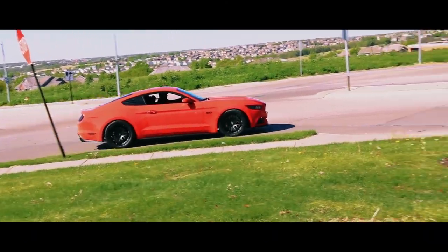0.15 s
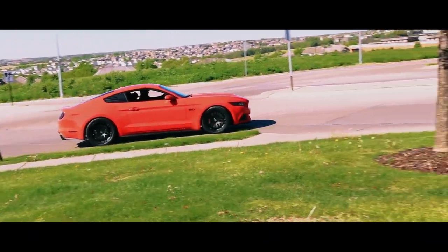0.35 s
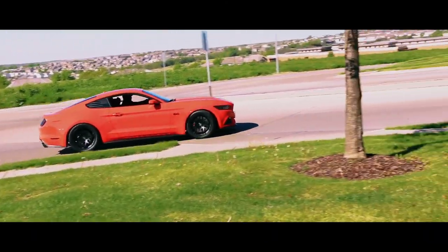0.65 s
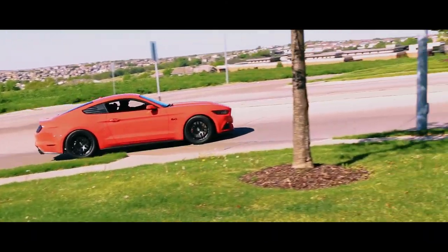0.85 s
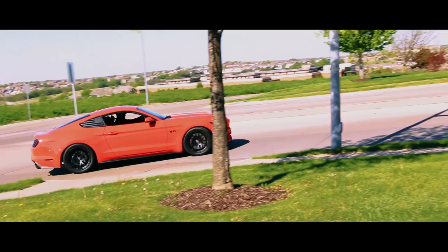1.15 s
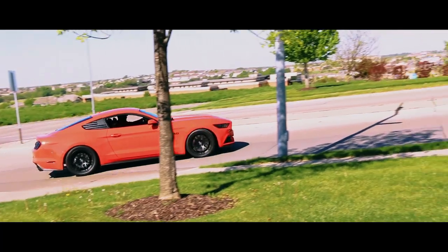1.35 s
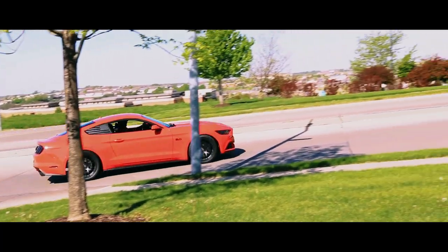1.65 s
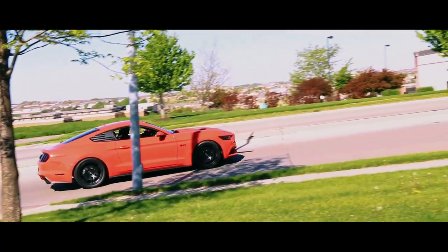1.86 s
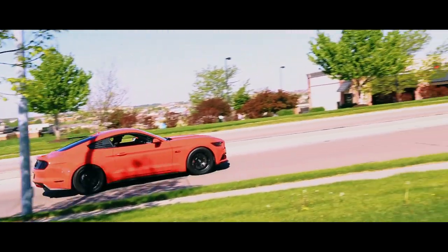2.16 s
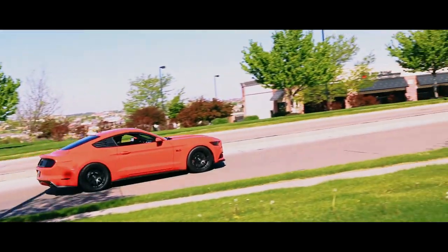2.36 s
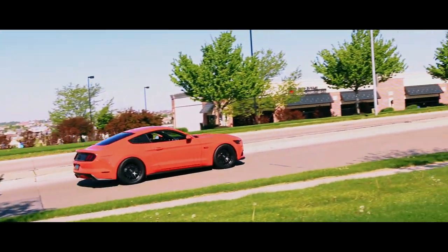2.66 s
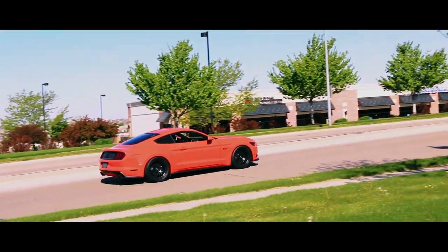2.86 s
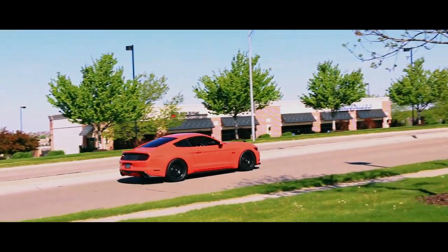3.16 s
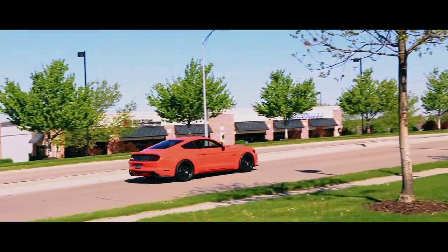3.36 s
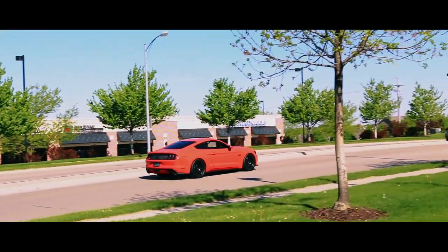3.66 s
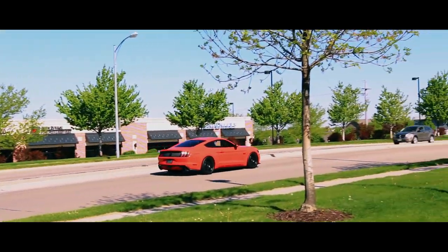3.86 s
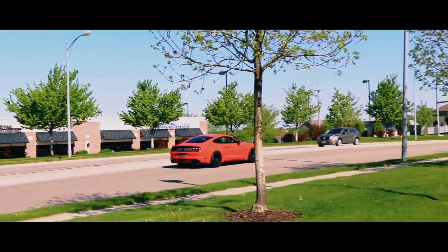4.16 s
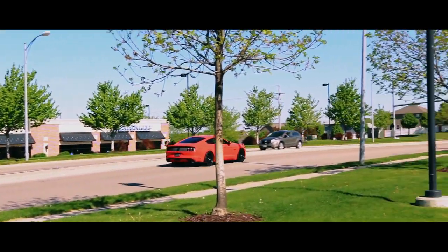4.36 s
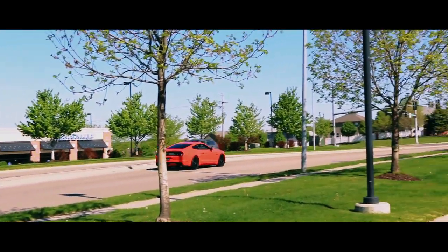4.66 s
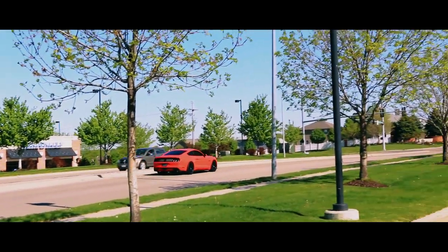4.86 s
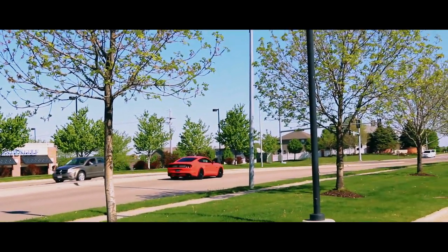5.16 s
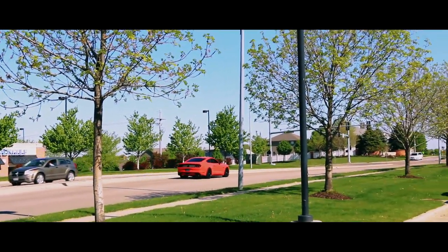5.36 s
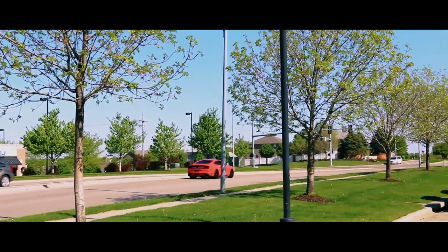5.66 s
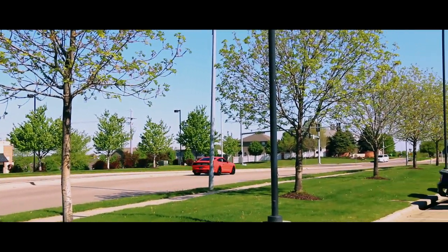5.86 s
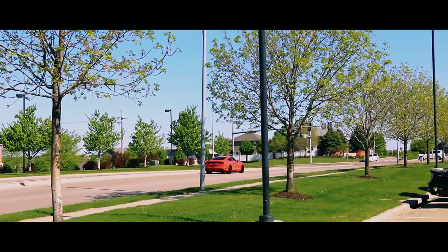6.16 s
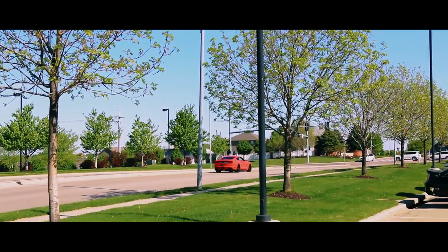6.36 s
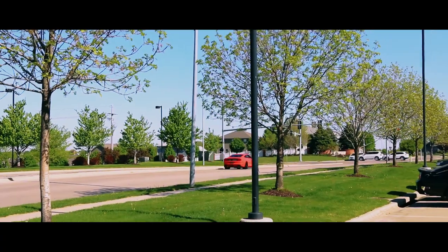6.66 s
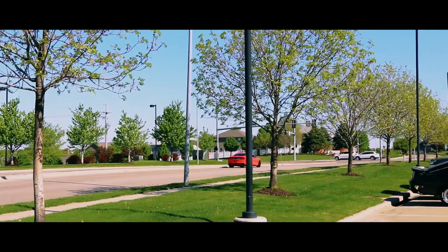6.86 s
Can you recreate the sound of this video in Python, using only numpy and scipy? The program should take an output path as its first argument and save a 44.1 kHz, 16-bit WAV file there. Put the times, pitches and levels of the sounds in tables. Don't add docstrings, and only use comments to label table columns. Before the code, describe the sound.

Loud V8 exhaust drone climbs and turns raspy as it passes, lifts with pops, surges in second gear, then recedes amid sharp backfires.

```python
import sys
import numpy as np
from scipy import signal
from scipy.io import wavfile
from scipy.ndimage import uniform_filter1d, map_coordinates

SR = 44100
rng = np.random.default_rng(int(sys.argv[2]) if len(sys.argv) > 2 else 0)


def how_loud(loudness_db):
    steps = np.asarray(loudness_db, float) / 20
    return 10 ** steps


def to_wav(sig):
    pcm = np.clip(np.atleast_2d(sig), -1, 1) * 32767
    pcm = np.round(pcm).astype(np.int16)
    wavfile.write(sys.argv[1], SR, pcm.T)


N = 308700
T = np.arange(N) / SR
PASS_S = 2.786


def evened(x):
    return x / np.sqrt(np.mean(x ** 2) + 1e-20)


def levelled(x):
    return x / np.sqrt(abs(uniform_filter1d(x ** 2, SR // 4)) + 1e-12)


def curves(rows):
    s, *columns = np.transpose(rows)
    return [np.interp(T, s, c) for c in columns]


def rise(s, span):
    return .5 + .5 * np.tanh((T - s) / span)


def passed(x, hz, kind):
    return signal.sosfilt(signal.butter(4, hz, kind, fs=SR, output="sos"), x)


def colour(x, points):
    hz, db = np.transpose(points)
    circle = abs(np.fft.fftfreq(8192, 1 / SR)) + 1
    gain_db = np.maximum(np.interp(np.log(circle), np.log(hz), db), -70)
    log_gain = np.log(how_loud(gain_db))
    taps = np.fft.ifft(np.exp(np.conj(signal.hilbert(log_gain)))).real[:4096]
    return signal.oaconvolve(x, taps)[:N]


def resonate(x, hz, width):
    turn = np.exp(2j * np.pi * np.cumsum(hz * np.ones(N)) / SR)
    r = np.exp(-np.pi * width / SR)
    return 2 * (turn * signal.lfilter([1 - r], [1, -r], x / turn + 1e-18)).real


def fading(x, seconds):
    return signal.lfilter([1], [1, -np.exp(-1 / (seconds * SR))], x)


def delayed(x, hz):
    return map_coordinates(x, [np.arange(N) - SR / hz], order=1)


# start_s [s], level_db [dB]
WIND = [(0, -26), (.3, -28), (.75, -38), (1.4, -35.5), (1.7, -43), (2.5, -41), (3.0, -56), (3.9, -38),
        (4.2, -58.5), (6.2, -37), (6.42, -23.5), (7, -32.5)]
# pitch_hz [Hz], level_db [dB]
GUST = [(15, -20.5), (25, -3), (60, 5.5), (110, 1.5), (160, 1), (220, -8.5)]
# start_s [s], level_db [dB]
THUMPS = [
    (0.151, -9),
    (.163, -7),
    (0.231, -13.5),
]


def wind():
    lumps_db = 1.5 * evened(uniform_filter1d(rng.standard_normal(N), 1800))
    slow = uniform_filter1d(uniform_filter1d(rng.standard_normal(N), 2500), 2500)
    gusts_db = -1 * evened(slow)
    knocks = sum(-how_loud(db) * np.exp(-((T - s) / 0.0048) ** 2) for s, db in THUMPS)
    buffeting = passed(how_loud(lumps_db) * colour(rng.standard_normal(N), GUST), 970, "low")
    return passed(knocks, 25, "high") + how_loud(curves(WIND)[0] + 1.0 + gusts_db) * levelled(buffeting)


def foliage():
    hiss = colour(rng.standard_normal(N), [(3000, -23.0), (6500, -5.0), (9000, -10.5), (15000, -28)])
    return how_loud(-60.5) * (0.61 + np.exp(-T / 0.97)) * evened(hiss)


def oncoming():
    since = T - 4.25
    hz = 74.64 - 2.1 * since
    waver_db = 0.5 * evened(uniform_filter1d(rng.standard_normal(N), 6000))
    hum_db = -48 + 8.5 * since + waver_db
    rumble_db = np.minimum(-57 + 12 * since, -27.5)
    near = np.clip(since / 0.057, 0, 1)
    hum = np.sqrt(2) * how_loud(hum_db) * np.sin(2 * np.pi * np.cumsum(hz) / SR)
    rumble = colour(rng.standard_normal(N), [(70, -50), (95, -14.0), (116, 14.0), (180, 9.5), (260, -51.5)])
    tyre_points = [(1500, -49.5), (2800, 7), (4500, 7.0), (5500, -17.5), (9000, -44)]
    tyres = evened(colour(rng.standard_normal(N), tyre_points))
    tyres = how_loud(-29.5) * np.exp(-((T - 6.65) / 0.26) ** 2) * tyres
    return passed(near * (hum + how_loud(rumble_db) * evened(rumble)), 900, "low") + tyres


def street(x):
    t = np.arange(SR // 2) / SR
    signs = rng.choice([-1., 1.], len(t))
    taps = signs * (rng.random(len(t)) < .05) * how_loud(-60 * t / 0.36) * (t > .012)
    return signal.oaconvolve(x, taps / np.linalg.norm(taps))[:N]


def ground(x):
    echo_hz = np.maximum(283.3 + 96.6 * (T - PASS_S), 283.6)
    weak, strong, edge_s = 0.31, 0.6, 0.14
    strength = weak + (strong - weak) * rise(0.36, edge_s) * (1 - rise(5.2, edge_s))
    since_kerb = T - 4.91
    kerb_hz = np.clip(2540 + 900 * since_kerb, 1900, 3300)
    kerb = 0.18 + (0.73 - 0.18) * np.exp(-(since_kerb / 0.67) ** 2)
    dull = signal.lfilter([.33], [1, -.67], x)
    bright = passed(x - dull, 8200, "low")
    return x + np.clip(strength, 0, 1) * delayed(dull, echo_hz) + np.clip(kerb, 0, 1) * delayed(bright, kerb_hz)


# pitch_hz [Hz], level_db [dB], decay_t60_s [s]
POP_MODES = [(333, -4.5, 0.054), (669, -6.5, 0.042), (1069, -3.5, 0.022)]
# start_s [s], peak_db [dB], treble_db [dB over the peak]
POPS = [(.054, -4.5, -46.5), (0.149, -9, -48), (0.264, -4.5, -40.5), (0.316, -0.5, -46), (0.873, -9.5, -37),
        (0.968, -11, -40), (1.017, -14, -43), (1.609, -7.5, -35), (3.226, -10.5, -45.5), (3.241, -9.5, -40),
        (3.276, -7, -43), (3.292, -10.5, -51), (3.418, -5, -43.5), (3.483, -20.5, -49), (3.572, -15, -44),
        (3.61, -7, -47), (3.65, -15, -44), (3.673, -11, -42.5), (3.691, -6.5, -60), (5.357, -7, -22),
        (5.406, -10, -47), (5.755, -1, -55), (5.933, 0, -28), (6.051, -1, -35), (6.089, 0, -31),
        (6.106, 9, -24), (6.168, 5.5, -23), (6.197, -7.5, -25.5), (6.206, 6, -18), (6.427, -1.5, -34),
        (6.593, -4.5, -27), (6.775, 6, -26), (6.822, -6, -32), (6.843, -8.5, -25.5), (6.867, -11.5, -36),
        (6.948, -3, -30), (6.965, -1.5, -36)]


def pops():
    t = np.arange(2600) / SR
    out = np.zeros(N + 2600)
    ring = sum(how_loud(d - 60 * t / t60) * np.sin(2 * np.pi * hz * t) for hz, d, t60 in POP_MODES)
    ring = ring * (1 - np.exp(-t / 0.00074))
    for (s, db, treble_db), noise in zip(POPS, rng.standard_normal((len(POPS), len(t)))):
        burst = (noise - 4 * (t == 0)) * np.exp(-t / .0018)
        grit = passed(passed(burst, 320, "high"), 3470, "low")
        spit = passed(passed(burst, 3500, "high"), 11000, "low")
        body = ring + 1.87 * how_loud(treble_db + 27.0) * grit
        pop = body / abs(body).max() + how_loud(treble_db - 1.5) * spit / abs(spit).max()
        out[int(s * SR):][:len(t)] += how_loud(db - 3) * pop
    return ground(out[:N])


# start_s [s], peak_db [dB]
SNAPS = [(3.953, -31), (3.981, -25.5), (3.9857, -28), (4.0062, -29), (4.0216, -21.5), (4.0445, -26),
         (4.0471, -20.5), (4.063, -26.5), (4.068, -23.5), (4.1079, -17), (4.1116, -19), (4.114, -16.5),
         (4.116, -19), (4.1187, -23.5), (4.1349, -18), (4.138, -23), (4.1518, -17.5), (4.1546, -19.5),
         (4.1824, -21), (4.2471, -22), (4.255, -28.5)]


def snaps():
    t = np.arange(400) / SR
    out = np.zeros(N)
    for (s, db), noise in zip(SNAPS, rng.standard_normal((len(SNAPS), len(t)))):
        out[int(s * SR):][:len(t)] += how_loud(db + 15) * (noise - 3 * (t == 0)) * np.exp(-t / 0.00077)
    return passed(colour(out, [(2000, 19.5), (6000, -10.5), (15000, -30)]), 4200, "high")


# strength_db [dB], lateness [share of firing gap], hiss_db [dB]
FACING = [(-12, 0, 0), (0, .02, -4), (-3, -.08, -16), (-4, .06, -14), (0, 0, -5), (-4, -.1, -14),
          (-7, -.07, -17), (-12, 0, -20)]
# pitch_hz [Hz], width_hz [Hz], level_db [dB]
MOUTH = [(636, 360, 17.5), (1060, 650, 22.5), (2500, 1100, -19.5)]
FACING_FROM_S, FACING_TO_S = 2.297, 2.99


def tailpipe(cycles):
    count = int(8 * cycles[-1]) - 4
    db, late, hiss_db = np.array(FACING)[np.arange(count) % 8].T
    chance = rng.standard_normal((count, 2))
    firing = np.arange(count) + 3.9 + late + .015 * chance[:, 0]
    at = np.interp(firing / 8, cycles, np.arange(N)).astype(int)
    clicks, puffs = (np.bincount(at, how_loud(d + chance[:, 1]), N) for d in (db, hiss_db))
    rasp_points = [(1100, -27.5), (1700, -2), (2500, -3), (3300, 2.5), (5500, -10), (9000, -34)]
    rasp = colour(np.bincount(at, how_loud(.3 * db), N), rasp_points)
    t = np.arange(400) / SR
    pulse = sum(how_loud(d) * np.exp(-np.pi * w * t) * np.cos(2 * np.pi * hz * t) for hz, w, d in MOUTH)
    ring_points = [(150, -8), (400, -6.5), (3000, 0.0), (5500, -11.0), (9000, -33.5), (15000, -51.5)]
    ring = colour(signal.oaconvolve(clicks, pulse)[:N], ring_points)
    ring = ring + 0.21 * delayed(ring, 410)
    hiss_points = [(1500, -27.5), (3000, 10.0), (6000, 2.5), (9000, -16.5), (15000, -34.5)]
    hiss = colour(fading(puffs, .003) * rng.standard_normal(N), hiss_points)
    ticks = colour(puffs, [(3000, -29.0), (6000, 4.5), (15000, -15)])
    spit = how_loud(-10.5) * levelled(hiss) - how_loud(-27.5) * levelled(ticks) - how_loud(-13) * levelled(rasp)
    return spit * (1 - 1.3 * rise(FACING_TO_S - .08, 0.019)) - levelled(ring)


# strength_db [dB], lateness [share of firing gap], bank [0 left, 1 right]
CYLINDERS = [(-9, -0.017, 0.18), (-1, -.06, 0.91), (3.5, 0.011, 0.85), (-13, 0.039, 0.055), (0, 0.1, 0.93),
             (1.5, -0.0055, 0.12), (3, -0.044, 0.3), (-1.5, .04, 0.99)]


def firings(cycles, uneven, scatter_db, jitter):
    bank_lag_s = 0.001108
    count = int(8 * cycles[-1])
    strength_db, late, bank = np.array(CYLINDERS)[np.arange(count) % 8].T
    chance = rng.standard_normal((count, 2))
    at = np.interp((np.arange(count) + 0.2331 + late) / 8, cycles, np.arange(N)) + bank * bank_lag_s * SR
    rough = np.interp(at, np.arange(N), uneven)
    at = np.clip(at + jitter * SR * rough * chance[:, 0], 0, N - 1).astype(int)
    size = how_loud(strength_db * (0.5 - rough) + scatter_db * rough * chance[:, 1])
    return np.bincount(at, size, N)


ORDERS = (16, 8, 24, 14, 17, 22, 5, 10, 12, 11, 13, 15, 23, 32, 38, 43, 29, 37, 18, 18, 24, 19, 21, 26, 31,
          34, 35, 36, 39, 41, 47)
# centre_hz [Hz], half_width_hz [Hz], level_db [dB over the engine level]
FIRST_GEAR = [(291.3, 61.3, 2.5), (236.2, 23.4, -4.5), (343, 25, 0), (303, 24, -3), (270, 10, -12),
              (542, 240, -18), (166, 10, -29.5), (260, 18, -13.5), (346, 35, -16), (272, 19, -7.5),
              (286, 10, -15.5), (348, 32, -7.5), (530, 120, -14), (796, 310, -23), (900, 160, -17),
              (1095, 17, -19), (900, 120, -9), (1210, 100, -8.5), (340, 17, -9), (432, 15, -19),
              (538, 45, -12), (610, 65, -14.5), (333, 18, -6.5), (590, 64, -19), (806, 14, -20),
              (784, 19, -13.5), (905, 26, -20), (600, 200, -21.5), (1170, 55, -9), (1100, 23, -9),
              (1145, 45, -13.5)]
SECOND_GEAR = [(361, 32, 2.5), (221.6, 13, -16), (546, 29, -24.5), (315, 30, -4.5), (426, 51, -21),
               (561.3, 7.7, -3.5), (138, 23, -44.5), (260, 9.1, -21.5), (327, 25, -21.5), (274, 22, -24),
               (336, 45, -17), (333.7, 43, -7), (566, 24, -13), (790, 22, -23.5), (910, 70, -18.5),
               (1120, 31, -15), (728, 25, -19), (885, 20, -21.5), (455, 13, -10.5), (426, 13, -17),
               (615, 15, -14.5), (534, 7.2, -12), (554, 27, -8.5), (673, 16, -12.5), (736, 35, -8),
               (870, 21, -24.5), (878, 11, -11), (939, 8.2, -10), (950, 31, -14), (1013, 13, -9),
               (1125, 30, -18)]


def ringing(gear, speed):
    hz, width, db = np.transpose(gear)[:, :, None]
    return how_loud(db) / (1 + ((np.array(ORDERS)[:, None] * speed - hz) / width) ** 2)


def order_strengths(speed, geared, uneven, level_db, settle):
    slow_speed, slow_gear = speed[::50], geared[::50]
    clean = (1 - slow_gear) * ringing(FIRST_GEAR, slow_speed) + slow_gear * ringing(SECOND_GEAR, slow_speed)
    wobble = evened(passed(rng.standard_normal(clean.shape), 1100, "low"))
    wobble_db = 2.8 * np.where(np.array(ORDERS) % 8, 1, .4)[:, None] * wobble
    clean = np.array([np.interp(T, T[::50], w) for w in clean * how_loud(wobble_db)])
    clean = clean * ((1 - uneven) ** 1.48 * how_loud(level_db))
    return clean * (1 - .7 * (np.array(ORDERS)[:, None] % 8 > 0) * settle)


def order_tones(clean, speed, cycles, geared, steep):
    starts = (1.44, 0.26, 3.64, 0.088, 4.0, 1.2, 0.7, 3.96, 4.2, 2.46, 3.1, 2.03, 3.6, 1.6, 5.2, 0.19, 4.0, 3.87)
    starts = starts + (2.6, 2.6, starts[2]) + tuple(rng.uniform(0, 2 * np.pi, len(ORDERS) - 21))
    slipped = cycles + .4 * geared
    tones = sum(np.sqrt(2) * a * np.sin(2 * np.pi * k * slipped + start)
                for a, k, start in zip(clean, ORDERS, starts))
    pair = clean[0] + geared * clean[11] * np.exp(1j * (starts[11] - starts[0] - 2 * np.pi * slipped))
    unsteady = .06 * evened(passed(rng.standard_normal(N), 200, "low"))
    trough = 2 * np.pi * 16 * slipped + starts[0] + np.angle(pair) + np.pi / 2 + unsteady
    scatter = evened(passed(rng.standard_normal(N), 160, "low"))
    lope = .66 + .1 * np.cos(2 * np.pi * cycles + 1.6) + .15 * scatter
    steep = steep * (abs(pair) / (clean[0] + geared * clean[11] + 1e-9)) ** .15
    overtones = sum(steep ** (m - 1) * np.cos(m * trough) for m in range(2, 22))
    spikes = passed(.8 * abs(pair) * lope * overtones, 4400, "low")
    softened = .55 * resonate(spikes, 32 * speed, 260) + .25 * resonate(spikes, 48 * speed, 200)
    return tones - spikes + geared * softened


# pitch_hz [Hz], width_hz [Hz], level_db [dB]
BARK = [(501.5, 123, 10.5), (795, 436, 10), (1159, 200, 10), (1320, 320, -2.5)]


def boom_and_bark(clicks, jets, speed, uneven, boom_hz):
    drive = -levelled(clicks) + (.07 + 1.8 * uneven) * jets
    for k in ORDERS[:8]:
        drive = drive - resonate(drive, k * speed, 10.0)
    boom = passed(resonate(resonate(drive, boom_hz, 165), boom_hz, 120), 150.6, "high")
    bark = sum((-1) ** k * how_loud(db) * resonate(resonate(drive, hz, w), hz, 2 * w)
               for k, (hz, w, db) in enumerate(BARK))
    return boom, bark


# pitch_hz [Hz], level_db [dB]
TREBLE = [(590, -60), (1000, 9), (1150, 6), (1300, -2.5), (1440, -3.5), (1560, -15), (1680, -6),
          (2650, -7.5), (3340, -13), (15600, -66)]
FRONT_DB = (2, -6, -3, -3, 0, -9, -11, -3)
LOPE_FROM_S = 1.15


def rasp_and_crack(clicks, jets, cycles, uneven, flow, far):
    fronts = clicks ** 2.1 * how_loud(np.array(FRONT_DB))[(8 * cycles).astype(int) % 8]
    sizzle = levelled((fading(fronts, .005) + .33 * flow + 2 * uneven ** 2) * rng.standard_normal(N))
    rasp = colour(-levelled(clicks) + (.8 + 5 * uneven) * jets, TREBLE)
    rasp = passed(passed(rasp, 1450, "high"), 5200, "low")
    front_gain = .9 * (1 - uneven) * (.4 + .6 * rise(LOPE_FROM_S, .3))
    crack = passed(colour(-front_gain * levelled(fronts) + sizzle, TREBLE), 5200, "high")
    top = passed(crack, 10400, "high")
    top_db = 16 * (.4 + .6 * rise(2.2, .15)) - 15 * far
    return rasp, crack + (how_loud(top_db) - 1) * top


# start_s [s], speed [engine cycles a second]
REVS = [(0, 13.54), (.36, 16.49), (.84, 18.86), (1.56, 22.75), (1.8, 24.3), (1.94, 24.45), (2.64, 31.3),
        (2.9, 32.95), (3.02, 32.7), (3.6, 26.3), (3.75, 21), (3.9, 22.09), (4.03, 24.63), (4.17, 22.46),
        (4.32, 23.8), (4.6, 24.9), (5.28, 26.2), (7, 23.5)]
# start_s [s], surge [% of engine speed]
SURGE = [(.36, .2), (.52, -1.2), (.7, 0), (1.15, 0), (1.44, .7), (1.64, -1.4), (1.76, .1), (2.05, .2),
         (2.2, .7), (2.47, -.9), (2.6, .7), (2.76, -.7), (2.9, .1),
         (3.9, 0), (3.97, .8), (4.13, -.9), (4.27, .7), (4.45, -1), (4.6, .8), (4.72, 0), (4.9, -.4),
                (5.05, 1), (5.2, 0), (5.42, -.3), (5.55, .6), (5.65, 0), (5.85, 1.5)]
# start_s [s], level_db [dB], tailpipe roar_db [dB re level],
# edge_db as the pipes turn to the listener [dB]
DRIVE = [(0, -8.5, -16.5, -12.5), (.9, -10.5, -11.5, -12.5), (1.7, -12, -4, -11.5), (2.55, -10, -1, -6.5),
         (2.9, -14, 0.5, -3.5), (3.04, -20.5, -3, -12), (3.18, -25.5, -6.5, -9), (3.84, -15.5, -16.5, -2.5),
         (3.92, -9, -10.5, -4.5), (3.97, -9, -6.5, 0), (4.2, -19, -1, -1), (4.42, -13.5, -9.5, 1.5),
         (4.62, -15.5, -1, 5.5), (4.95, -20.5, -2.5, 1), (5.25, -17.5, -2.5, 2.5), (5.6, -21, -7, -3),
         (6.1, -16.5, -1.5, -0.5), (7, -15.5, -4.5, -1.5)]
# start_s [s], uneven burning [0-1], boom centre pitch_hz [Hz], drone steepening [0-1]
BURNING = [(0, .18, 290, .5), (.5, .13, 280, .35), (2.2, .07, 305, .2), (2.97, .05, 310, .2),
           (3.1, .7, 345, .1), (3.8, .6, 350, .1), (3.92, .07, 370, .3), (3.97, .07, 375, .82),
           (5.3, .1, 380, .78), (5.8, .3, 360, .3), (6, .9, 310, .1)]


def engine():
    speed = curves(REVS)[0] * (1 + curves(SURGE)[0] / 100)
    level_db, roar_db, edge_db = curves(DRIVE)
    uneven, boom_hz, steep = curves(BURNING)
    cycles = np.cumsum(speed) / SR
    geared = rise(3.7, .04)
    settle = np.exp(-((T - 4.16) / .11) ** 4)

    boom_power = how_loud(level_db) ** 2 * np.maximum(1 - how_loud(roar_db) ** 2, .05)
    bark_db = level_db + roar_db - 10 * np.log10(1 + how_loud(edge_db) ** 2)
    rasp_db = bark_db + edge_db
    air_most_db = 15
    air_db = np.clip(26 * (T - PASS_S), 0, air_most_db)
    crack_db = rasp_db - 10.5 + 0.89 * edge_db + 8 * uneven - air_db

    clicks = firings(cycles, uneven, scatter_db=4.0, jitter=0.0013)
    flow = 1.05 * np.sqrt(uneven)
    jets = levelled((fading(clicks, .004) + flow) * rng.standard_normal(N))
    boom, bark = boom_and_bark(clicks, jets, speed, uneven, boom_hz)
    rasp, crack = rasp_and_crack(clicks, jets, cycles, uneven, flow, air_db / air_most_db)

    clean = order_strengths(speed, geared, uneven, level_db, settle)
    tones = order_tones(clean, speed, cycles, geared, steep + 0.071 * settle)
    boom_gain = np.sqrt(np.maximum(boom_power - (clean ** 2).sum(0), 0.083 * boom_power))

    throb_db = 3 * geared * (1 - uneven) * (np.cos(2 * np.pi * cycles + 0.35) - .3)
    lope_db = 2 * rise(LOPE_FROM_S, .2) * (T < PASS_S) * np.cos(2 * np.pi * cycles - 2.95)
    throb_db = throb_db + 0.5 * settle + lope_db
    upper = how_loud(crack_db + throb_db) * levelled(ground(crack))
    whine = how_loud(-1.5) + how_loud(6.5) * np.exp(-((T - 4.36) / 0.21) ** 2)
    upper = upper + whine * resonate(upper, 8750, 1800)
    upper = upper + how_loud(bark_db) * levelled(ground(bark)) + how_loud(rasp_db + throb_db) * levelled(ground(rasp))
    facing = rise(FACING_FROM_S, 0.25) * (1 - rise(FACING_TO_S, 0.019))
    upper = how_loud(-9 * facing) * upper + facing * how_loud(level_db - 4) * tailpipe(cycles)
    return tones + boom_gain * levelled(ground(boom)) + upper


def scene():
    bangs = pops()
    echoes = how_loud(-8.5) * passed(street(bangs), 2400, "low")
    background = wind() + foliage() + oncoming()
    return passed(background + echoes + bangs + snaps() + engine(), 22, "high")[None]


def low_pass(x):
    return signal.sosfilt(signal.butter(12, 15700, fs=SR, output="sos"), x)


def record(dry):
    mix = np.clip(dry, -1, 1)
    return low_pass(mix)


dry = scene()
out = record(dry)
to_wav(out)
```